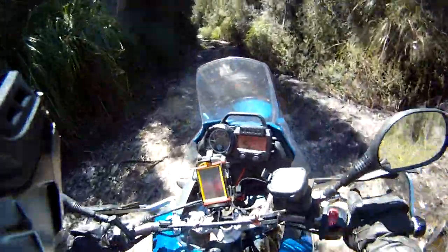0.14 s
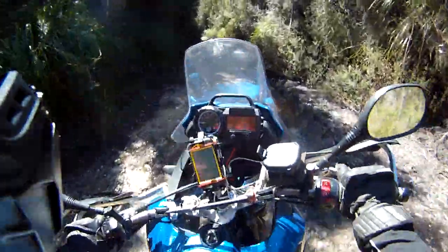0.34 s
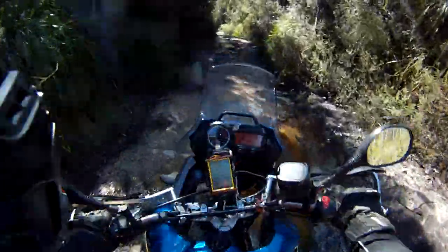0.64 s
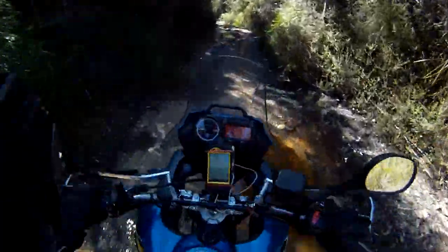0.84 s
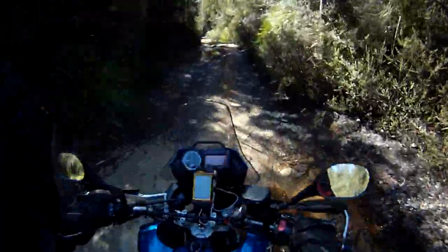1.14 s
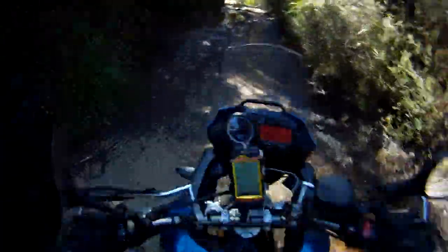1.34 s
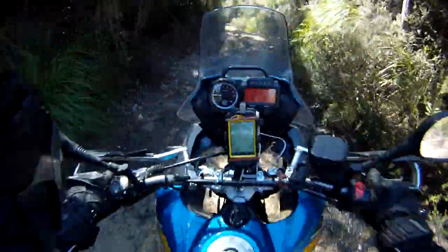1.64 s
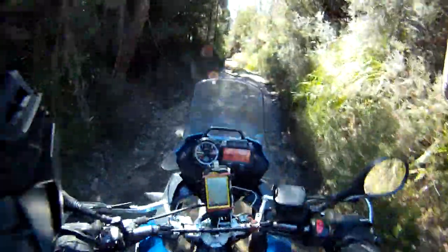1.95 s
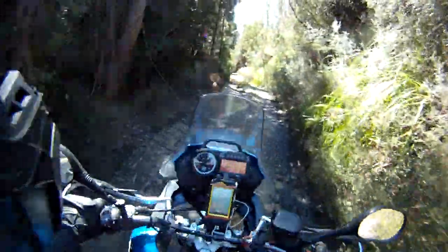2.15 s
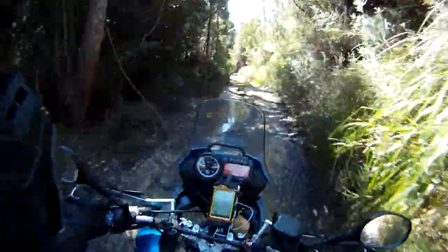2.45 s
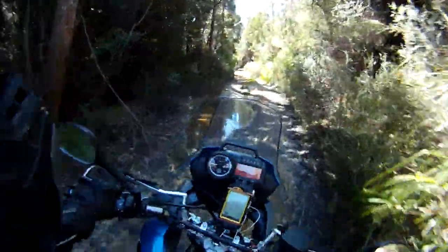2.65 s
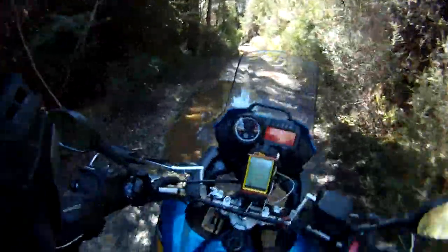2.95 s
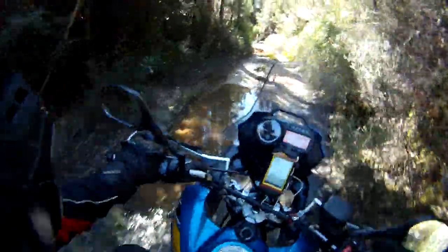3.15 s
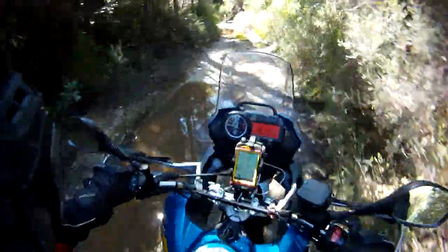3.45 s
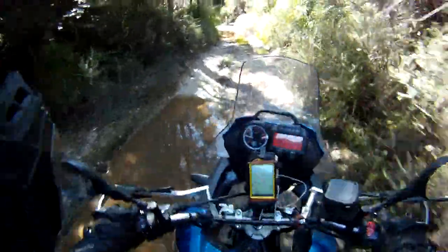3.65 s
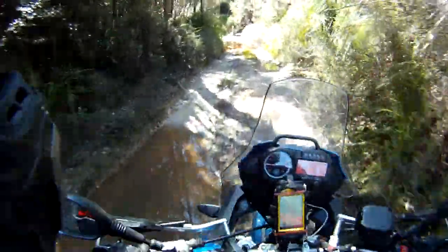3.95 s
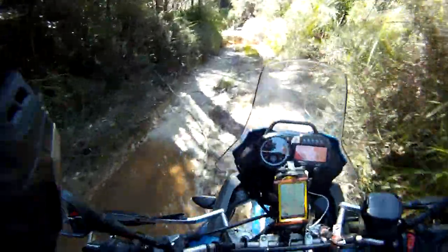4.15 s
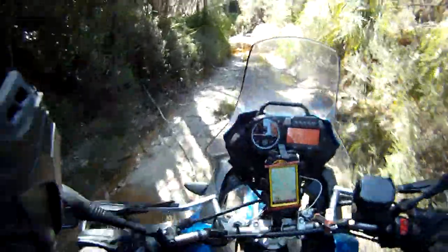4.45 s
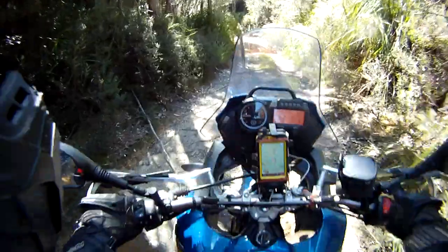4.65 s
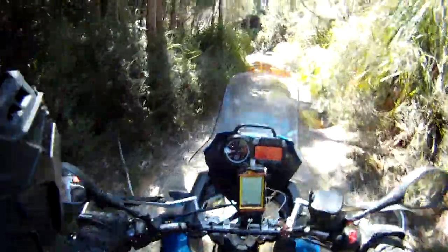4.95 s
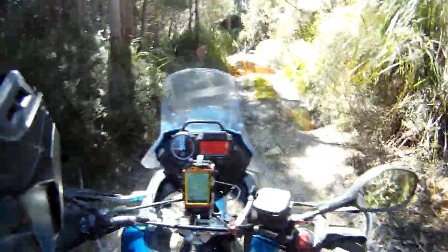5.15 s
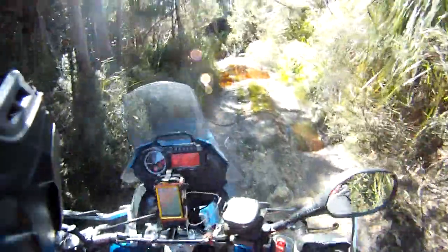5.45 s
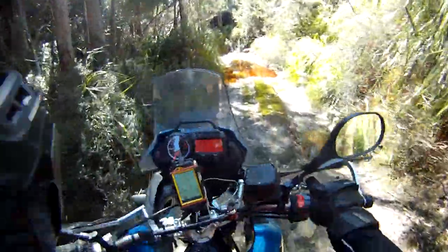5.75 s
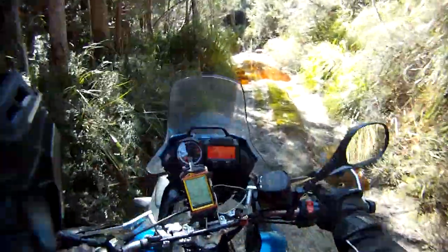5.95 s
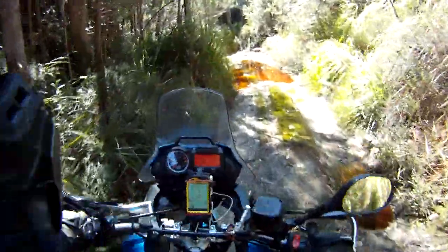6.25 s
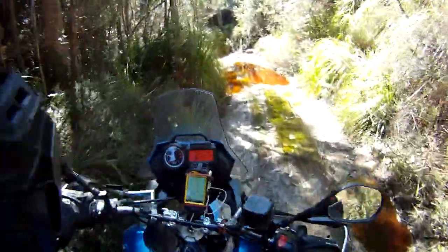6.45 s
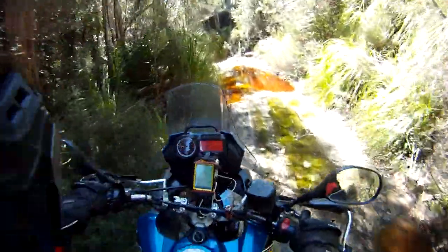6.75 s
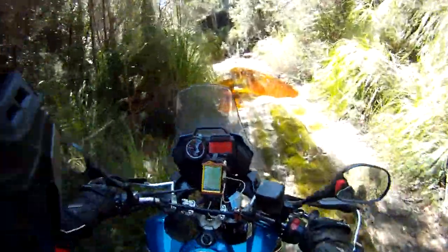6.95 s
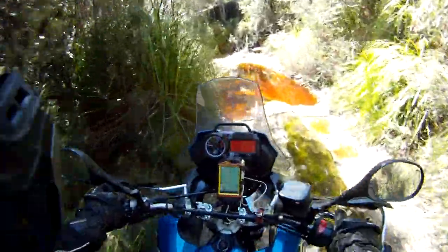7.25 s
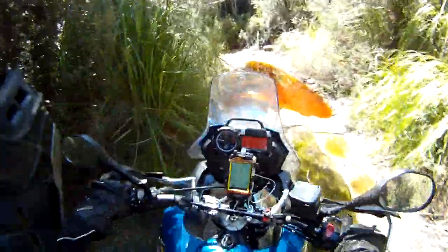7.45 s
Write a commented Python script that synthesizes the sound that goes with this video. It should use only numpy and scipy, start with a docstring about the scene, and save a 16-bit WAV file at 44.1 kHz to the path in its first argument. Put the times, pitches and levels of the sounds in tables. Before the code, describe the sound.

Heard up close, a trail motorcycle's thudding engine rises and falls as its tyres splash through water and loose fittings rattle.

```python
"""A single-cylinder trail motorcycle picks its way over rock and water, heard from the rider's helmet.
It starts at a rasping chug, each firing thudding from the muffler while valves and piston clatter.
From 1 s the tyres throw up puddles, loose fittings knock, twigs flick past and the throttle is blipped.
At 3.4 s the hardest bump shakes the microphone; stones crunch, then grit rattles up the mudguard.
The revs peak at 6 s with a rasp of intake air and sink back to a chug."""
import sys
import numpy as np
from scipy import signal
from scipy.fft import rfft, irfft
from scipy.io import wavfile

SR = 44100
rng = np.random.default_rng(int(sys.argv[2]) if len(sys.argv) > 2 else 0)


def output_pcm(signal):
    """Save a mono or channel-first signal as 16-bit PCM at the path in sys.argv[1].

    Samples are clipped to [-1, 1] before scaling.
    """
    pcm = np.clip(np.atleast_2d(signal).T, -1, 1) * 32767
    wavfile.write(sys.argv[1], SR, np.round(pcm).astype(np.int16))


N = 334719
TIME = np.arange(N) / SR
BINS_HZ = np.fft.rfftfreq(16384, 1 / SR)


def amp(db):
    """Decibels to gain."""
    return 10 ** (np.asarray(db) / 20)


def unit_rms(x):
    """Scales to unit rms."""
    return x / np.sqrt(np.mean(x ** 2) + 1e-20)


def curve(rows):
    """Joins (seconds, value) rows by straight lines."""
    return np.interp(TIME, *np.transpose(rows))


def add(mix, start_s, sound):
    """Mixes a sound in at start_s."""
    part = mix[max(round(start_s * SR), 0):][:len(sound)]
    part += sound[:len(part)]


def wander(hz):
    """Smooth random drift of unit rms and bandwidth hz."""
    lowpass = np.exp(-(np.fft.rfftfreq(N, 1 / SR) / hz) ** 2)
    return unit_rms(irfft(rfft(rng.standard_normal(N)) * lowpass, N))


def bells_db(hz, rows):
    """Sum of bell-shaped peaks or notches."""
    return sum(db * np.exp2(-(2 * (hz - centre) / width) ** 2) for centre, width, db in rows)


def body(colour, modes=()):
    """Minimum-phase impulse response of unit energy from a broad spectrum and resonances."""
    hz, db = np.transpose(colour)
    db = np.interp(np.log(BINS_HZ + 1), np.log(hz), db) + bells_db(BINS_HZ, modes)
    log_gain = np.log(amp(np.r_[db, db[-2:0:-1]]))
    spectrum = np.exp(np.conj(signal.hilbert(log_gain)))
    response = np.fft.ifft(spectrum).real[:len(BINS_HZ)]
    return response / np.linalg.norm(response)


def through(x, response):
    """Passes a sound through an impulse response."""
    return signal.oaconvolve(x, response)[:N]


def fading(x, decay_s):
    """Gives every click an exponential tail."""
    return signal.lfilter([1], [1, -np.exp(-1 / (decay_s * SR))], x)


def each_cycle(cycles, phase, spread_db=1):
    """One click of uneven size whenever the engine passes this phase (0-1) of its cycle."""
    passed = np.diff(np.floor(cycles - phase), prepend=np.floor(cycles[0] - phase))
    return passed * amp(spread_db * rng.standard_normal(N))


# Engine load. Each row: time in seconds, exhaust beat strength in dB.
LOAD = [(0, -51.5), (.43, -49), (.58, -52.5), (1.45, -49.5), (1.68, -56.5), (1.85, -47.5), (2.5, -48),
        (3.22, -50), (3.36, -56), (4.1, -54.5), (4.55, -52), (4.97, -55.5), (5.12, -57.5), (5.6, -55.5),
        (5.85, -48), (6.98, -52), (7.13, -56), (7.59, -57)]

def engine_gain(firing_hz, db, db_per_doubling, load_share, cruise_hz=15):
    """Gain that grows with revs and load; db holds at cruise and mean load."""
    load_db = curve(LOAD)
    revs_db = db_per_doubling * np.log2(firing_hz / cruise_hz)
    return amp(db + revs_db + load_share * (load_db - load_db.mean()))


# Muffler and pipe responses. Each row: frequency in Hz, gain in dB.
MUFFLER_COLOUR = [(15, -59), (60, 2.5), (110, 0.5), (145, -1), (180, 2.5), (215, 7), (250, 1.5), (288, 3),
                  (335, -18), (500, -18.5), (900, -37), (3000, -42)]
PIPE_COLOUR = [(15, -38), (30, -6.5), (44, 8.5), (58, -10), (72, -2), (86, 1), (100, -14), (125, -17.5),
               (200, -37.5), (600, -58.5)]
# Muffler air mode. Each row: centre in Hz, width in Hz, gain in dB.
CHAMBER_MODE = [(188.5, 43, 5)]

def exhaust(cycles, firing_hz, gas_s=.02, after_db=-12, hot_ratio=1.3, trim_db=1.37):
    """Each firing sends a pulse, a gasp of gas and an after-pulse; the muffler thuds, the pipe booms."""
    pulses = each_cycle(cycles, phase=0)
    gas = amp(-11) * fading(pulses, gas_s) * rng.standard_normal(N) / np.sqrt(gas_s * SR / 2)
    after_pulses = each_cycle(cycles, phase=.3)
    drive = (gas - pulses + amp(after_db) * after_pulses) / np.sqrt(firing_hz)
    # Hotter gas at high revs raises the muffler's note.
    heat = np.clip((firing_hz - 18) / 4, 0, 1)
    hot_mode = [(hz * hot_ratio, width, db) for hz, width, db in CHAMBER_MODE]
    thud = through(drive * (1 - heat), body(MUFFLER_COLOUR, CHAMBER_MODE))
    thud += through(drive * heat, body(MUFFLER_COLOUR, hot_mode))
    boom = through(-pulses, body(PIPE_COLOUR))
    boom_gain = engine_gain(firing_hz, db=-46.5, db_per_doubling=1.8, load_share=.84)
    return amp(curve(LOAD) + trim_db) * unit_rms(thud) + boom_gain * unit_rms(boom)


# Valve and piston blows. Each row: cycle phase 0-1, relative level in dB, decay in seconds.
BLOWS = [(0.039, -4, 0.01), (0.211, -3.5, 0.013), (.3, -12.5, 0.012), (0.443, -11, 0.013),
         (0.621, -7, 0.0042), (.785, -5.5, 0.013), (0.912, -5, 0.0041)]
# Casing response. Each row: frequency in Hz, gain in dB.
CASING_COLOUR = [(100, -31.5), (380, -1.5), (600, -4.5), (1000, -2), (1600, 3), (2200, -2), (3000, -5),
                 (3600, -12), (5000, -18), (7500, -22.5), (9500, -13), (13000, -10.5), (15000, -17)]
# Casing and fin resonances. Each row: centre in Hz, width in Hz, gain in dB.
CASING_MODES = [(800, 90, 2), (1150, 120, 8), (1450, 100, 2.5), (1820, 160, 4.5), (2410, 90, 5),
                (2780, 220, 4), (9250, 250, 5), (9600, 110, 3), (10190, 230, 5), (10830, 130, 3),
                (13800, 250, 6), (14820, 300, 4)]

def clatter(cycles, firing_hz, whirr_db=-12):
    """Valves and piston strike the casing in step with the cycle, over the whirr of chain and gears."""
    blows = sum(amp(db) * fading(each_cycle(cycles, phase, spread_db=1.6), decay_s)
                for phase, db, decay_s in BLOWS)
    rattle = np.hypot(blows, amp(whirr_db)) * rng.standard_normal(N)
    gain = engine_gain(firing_hz, db=-50.5, db_per_doubling=.95, load_share=.26)
    return gain * unit_rms(through(rattle, body(CASING_COLOUR, CASING_MODES)))


# Combustion ping spectrum. Each row: frequency in Hz, gain in dB.
PING_COLOUR = [(200, -24), (600, -9), (1200, -4), (1800, -2), (2800, -1), (3600, -14), (7500, -22),
               (10000, -17), (15000, -17)]
# Cylinder head resonances. Each row: centre in Hz, width in Hz, gain in dB.
HEAD_MODES = [(1103, 61, 2), (1783, 197, 18.5), (2360, 43, -7), (2800, 72, -4), (9500, 200, -3),
              (10280, 200, 21), (14000, 250, 19), (14500, 350, -10)]

def ping(cycles, firing_hz, rattle_s=.0093):
    """The charge ignites before the exhaust opens: a hard blow and a short rattle ring the head."""
    blow = each_cycle(cycles, phase=.79)
    rattle = fading(blow, rattle_s) * rng.standard_normal(N)
    drive = unit_rms(blow) + 1.3 * unit_rms(rattle)
    gain = engine_gain(firing_hz, db=-55.5, db_per_doubling=.38, load_share=.91)
    return gain * unit_rms(through(drive, body(PING_COLOUR, HEAD_MODES)))


# Airbox resonances. Each row: centre in Hz, width in Hz, gain in dB.
AIRBOX_MODES = [(1150, 100, 19), (1768, 240, 17.5), (2750, 180, 11.5)]

def intake(cycles, firing_hz, top_db=-47, growth=3.1, pulsing=.13):
    """Air rasps through the intake, pulsing with the cycle and swelling steeply with the revs."""
    rush = (1 + pulsing * np.cos(2 * np.pi * cycles)) * rng.standard_normal(N)
    airbox = body([(200, -25), (500, -9), (1300, -1), (2200, 1), (2800, 13.5), (3500, -13.5),
                   (7500, -13.5), (9400, 5), (11000, -3.5), (14800, -8)], AIRBOX_MODES)
    return amp(top_db) * (firing_hz / firing_hz.max()) ** growth * through(rush, airbox)


# Swells of gritty hiss: an opening rasp with the engine's chug, then puddle splashes from 1 s.
# Each row: start in seconds, length in seconds, level in dB.
HISS_SWELLS = [(0, 0.21, -52.5), (0.973, 0.52, -44.5), (1.364, 0.19, -43), (1.62, 0.56, -44),
               (3.007, 0.12, -49.5), (3.476, 0.66, -54), (5.09, .12, -57)]
HISS_FLOOR_DB = -60.5

def swells_db(rise_s=.05, fall_s=.26):
    """Hiss level: each swell rises fast, holds and dies away."""
    power = amp(HISS_FLOOR_DB) ** 2
    for start_s, length_s, db in HISS_SWELLS:
        rise = np.clip((TIME - start_s) / rise_s, 0, 1)
        fall = np.exp(-np.maximum(TIME - start_s - length_s, 0) / fall_s)
        power = power + (amp(db) * rise * fall) ** 2
    return 10 * np.log10(power)


# Hiss spectrum. Each row: frequency in Hz, gain in dB.
HISS_COLOUR = [(100, -20.5), (400, -8.5), (650, -8.5), (950, -7), (1130, 5.5), (1300, -5.5), (1750, 3.5),
               (2200, 0.5), (2850, -0.5), (3600, -13), (5000, -16), (8000, -18.5), (9700, -12),
               (15000, -17)]
# Mudguard resonances. Each row: centre in Hz, width in Hz, gain in dB.
MUDGUARD_MODES = [(2790, 120, 3.5), (3663, 310, 8), (4935, 330, 8), (7000, 440, 5), (9160, 230, 8)]

def gritty_hiss(hiss_db, grains_per_s=1400, grains_db=-3, surge_db=2.14):
    """Grains over surging noise: a rasp at first, then water and grit pelting the mudguards."""
    hits = rng.random(N) < grains_per_s / SR
    sizes = amp(2.4 * np.minimum(rng.exponential(1, N), 4))
    grains = hits * sizes * rng.choice([-1, 1], N)
    drive = unit_rms(rng.standard_normal(N) + amp(grains_db) * unit_rms(grains))
    return amp(hiss_db + surge_db * wander(hz=41.7)) * through(drive, body(HISS_COLOUR, MUDGUARD_MODES))


# Knocks of loose fittings. Each row: start in seconds, level in dB, brightness in dB.
KNOCKS = [(1.097, -28, 14), (1.109, -31, 12), (1.1468, -28.5, -9), (1.246, -33, 0), (1.7119, -33, -10),
          (1.8543, -35, -12), (2.8072, -30, -12.5), (2.9639, -26.5, -12.5), (3.244, -35, 2),
          (3.384, -42, 5), (3.515, -34, -13.5), (4.0594, -31, -1), (4.3527, -29, -11.5)]
# Fitting modes. Each row: frequency in Hz, relative level in dB, time to fall 60 dB in seconds.
FITTING_MODES = [(124, -12.5, 0.094), (680, -39, .03), (797, 11.5, 0.05), (1094, 5.5, 0.098),
                 (1427, 16, 0.04), (1534, 8.5, 0.077), (1986, 12, 0.04), (2280, -25, .015),
                 (2750, -26, .015)]

def knocks(crack_db=-9, crack_share=.24, crack_s=.0022):
    """Each blow rings a loose fitting; harder contact favours the high modes and a short crack."""
    out, t = np.zeros(N), TIME[:SR // 6]
    pivot_hz = FITTING_MODES[2][0]
    crack_response = body([(300, -12), (1500, 0), (3000, -5), (4500, -16), (8000, -17),
                           (10500, -1), (13800, -2), (15000, -12)])
    for start_s, db, bright_db in KNOCKS:
        ring = np.zeros(len(t))
        for hz, mode_db, t60_s in FITTING_MODES:
            tilt_db = 2 * bright_db * np.log10(hz / pivot_hz)
            ring += amp(mode_db + tilt_db - 60 * t / t60_s) * np.sin(2 * np.pi * (hz * t + rng.random()))
        burst = rng.standard_normal(len(t)) * np.exp(-t / crack_s)
        crack = amp(crack_db + crack_share * bright_db) * through(burst, crack_response)[:len(t)]
        add(out, start_s, amp(db) * (ring / abs(ring).max() + crack))
    return out


def scrapes(rows, colour):
    """Brief gritty contacts, each a dying burst of tiny slips."""
    out, t = np.zeros(N), TIME[:SR // 10]
    for start_s, db, decay_s in rows:
        slips = rng.standard_normal(len(t)) * amp(.37 * rng.standard_normal(len(t)))
        add(out, start_s, amp(db) * unit_rms(slips) * np.exp(-t / decay_s))
    return through(out, body(colour))


# Twig flicks. Each row: start in seconds, level in dB, decay in seconds.
TWIGS = [(.9838, -49.5, 0.0084), (1.1723, -30, 0.0012), (1.8947, -39, 0.0017), (2.2554, -41, .0013),
         (2.8944, -46, 0.0059), (3.4197, -42, 0.0042), (3.7011, -43, 0.0071), (5.0256, -49, 0.0048),
         (5.3179, -49.5, .003)]
# Flick spectrum. Each row: frequency in Hz, gain in dB.
TWIG_COLOUR = [(300, -28), (1500, -15), (3300, -7), (4100, -8), (4750, 2), (5500, -3), (6600, -4),
               (7400, 0), (8500, -10), (11000, -21), (15000, -25)]

def twigs():
    """Twigs flick the helmet in short, bright scrapes."""
    return scrapes(TWIGS, TWIG_COLOUR)


# Short gritty ticks: stone crunches, plus sharp engine ticks at 0.48 and 4.76 s.
# Each row: start in seconds, level in dB, decay in seconds.
TICKS = [(.482, -49, 0.031), (1.094, -36, 0.0021), (3.3554, -42.5, 0.018), (3.46, -47, .008),
         (3.715, -41, .018), (3.8235, -40, 0.0034), (4.187, -48, 0.0035), (4.758, -57, 0.014),
         (5.195, -50.5, 0.02)]
# Tick spectrum. Each row: frequency in Hz, gain in dB.
TICK_COLOUR = [(300, -15), (1500, -2), (2700, 5.5), (3700, 3), (4400, -5.5), (5000, -3.5), (7000, -10),
               (9500, -3.5), (15000, -28)]

def gritty_ticks(grit_start_s=3.86, run_s=.29, count=7, grit_db=-45, fade_db=-5, decay_s=.005):
    """Stones crunch, the engine ticks twice, and a fading run of grit rattles up the mudguard."""
    grit = []
    for i in range(count):
        along = (i + rng.random()) / count
        db = grit_db + fade_db * along + rng.uniform(-2, 2)
        grit.append((grit_start_s + run_s * along, db, decay_s))
    return scrapes(TICKS + grit, TICK_COLOUR)


# Bumps. Each row: start in seconds, level in dB.
JOLTS = [(0.591, -29.5), (1.16, -30), (1.256, -26.5), (1.478, -32.5), (1.547, -21.5), (1.682, -28),
         (1.849, -30.5), (3.202, -30), (3.382, -16.5), (3.54, -35), (5.23, -32), (7.508, -35)]
# Helmet shake spectrum. Each row: frequency in Hz, gain in dB.
SHAKE_COLOUR = [(10, -26), (25, -15), (40, 0.5), (60, -11.5), (100, -16.5), (200, -25), (400, -33.5),
                (1000, -62)]

def jolts(hiss_db, mount_hz=37.66, rise_s=.025, shake_db=-54, hiss_share=.58, drift_db=1.7):
    """Bumps swing the microphone mount; the helmet always shakes a little, more as the hiss swells."""
    out, t = np.zeros(N), TIME[:SR // 2]
    swing = t / rise_s * np.exp(1 - t / rise_s) * np.sin(2 * np.pi * mount_hz * t)
    for start_s, db in JOLTS:
        add(out, start_s, amp(db) * swing)
    shake_gain = amp(shake_db + hiss_share * (hiss_db - HISS_FLOOR_DB) + drift_db * wander(hz=1.54))
    return out + shake_gain * through(rng.standard_normal(N), body(SHAKE_COLOUR))


# Engine speed. Each row: time in seconds, firing rate in Hz.
FIRING_RATE = [(0.0, 12.01), (0.325, 15.78), (0.645, 12.13), (0.805, 14.18), (1.225, 12.79), (1.52, 21.57),
               (1.665, 13.86), (3.025, 18.19), (3.395, 12.79), (3.625, 13.8), (4.075, 12.23), (4.625, 14.6),
               (4.73, 10.59), (4.875, 14.64), (5.29, 11.69), (5.615, 13.57), (6.0, 25.94), (6.54, 17.2),
               (6.9, 16.49), (7.59, 10.28)]

def scene():
    """The engine's cycle drives exhaust, clatter, ping and intake; the ride's noises lie on top."""
    firing_hz, hiss_db = curve(FIRING_RATE), swells_db()
    cycles = np.cumsum(firing_hz) / SR - .04
    engine = sum(voice(cycles, firing_hz) for voice in (exhaust, clatter, ping, intake))
    ride = gritty_hiss(hiss_db) + knocks() + twigs() + gritty_ticks() + jolts(hiss_db)
    return (engine + ride)[None]


# Microphone housing notches. Each row: centre in Hz, width in Hz, gain in dB.
HOUSING_NOTCHES = [(6003, 575, -14), (12040, 1850, -17.5)]

def record(dry, low_cut_hz=19, high_cut_hz=15400):
    """The microphone loses the deepest bass and the top treble; its housing cuts two notches."""
    hz = np.fft.rfftfreq(N, 1 / SR)
    low_cut = hz ** 2 / np.hypot(hz ** 2, low_cut_hz ** 2)
    housed = irfft(rfft(dry) * amp(bells_db(hz, HOUSING_NOTCHES)) * low_cut, N)
    high_cut = signal.firwin(801, high_cut_hz, window=("kaiser", 9), fs=SR)
    return signal.oaconvolve(housed, high_cut[None], "same")


dry = scene()
out = record(dry)
output_pcm(out)
```